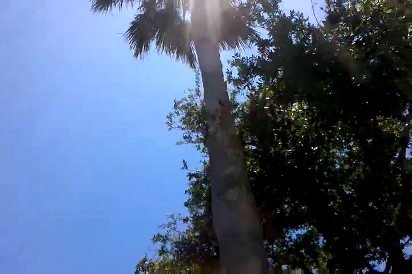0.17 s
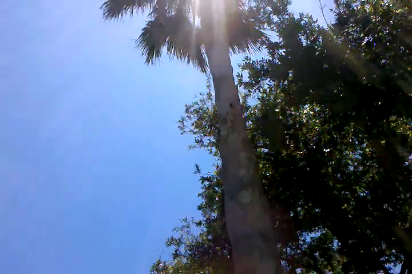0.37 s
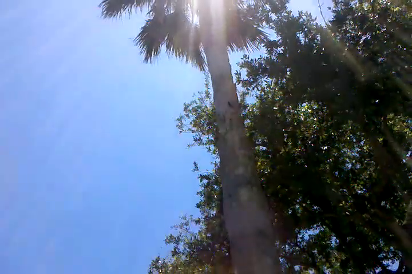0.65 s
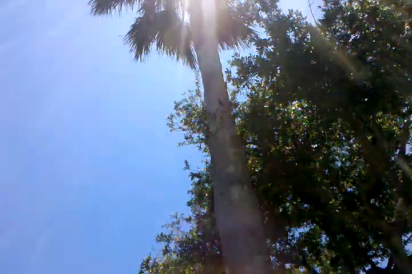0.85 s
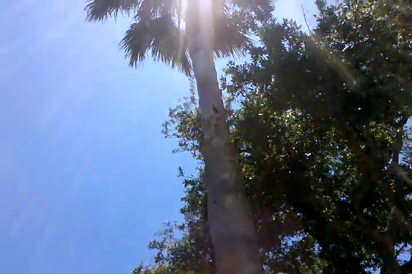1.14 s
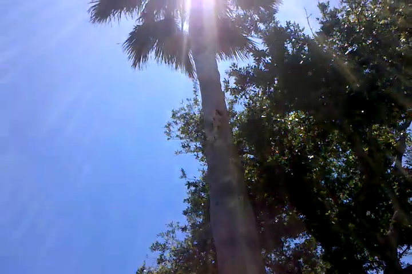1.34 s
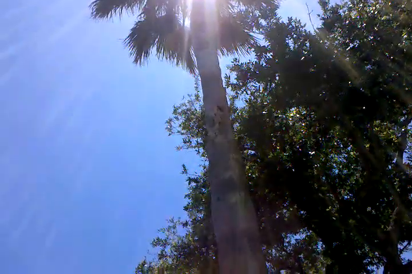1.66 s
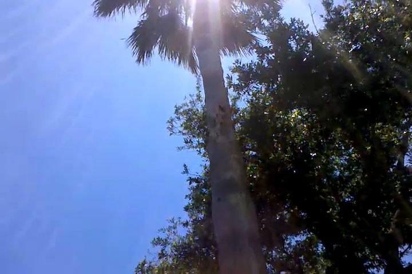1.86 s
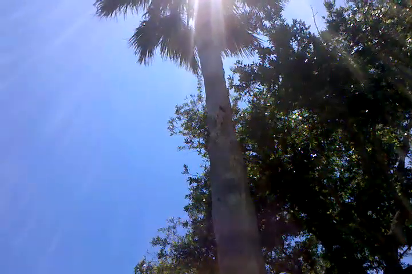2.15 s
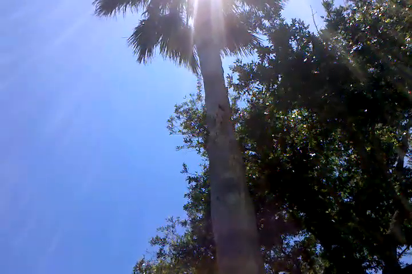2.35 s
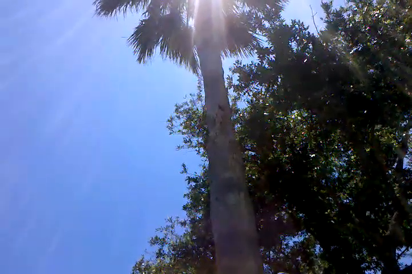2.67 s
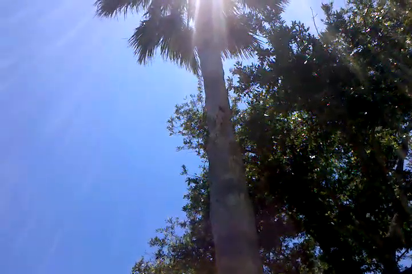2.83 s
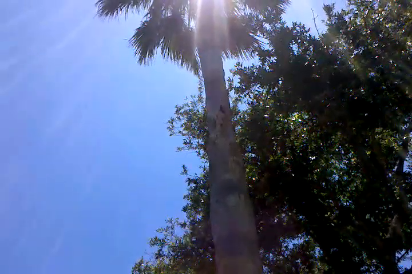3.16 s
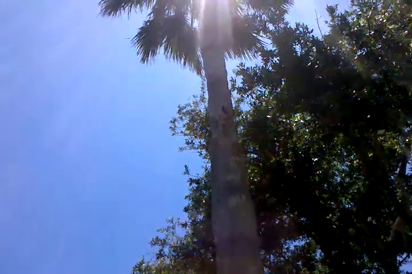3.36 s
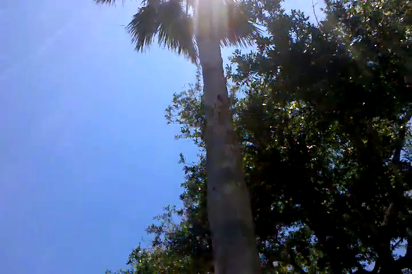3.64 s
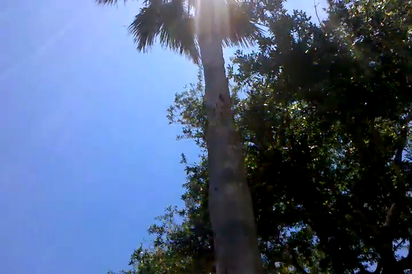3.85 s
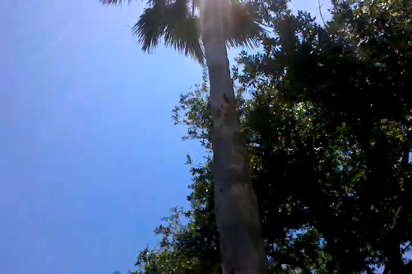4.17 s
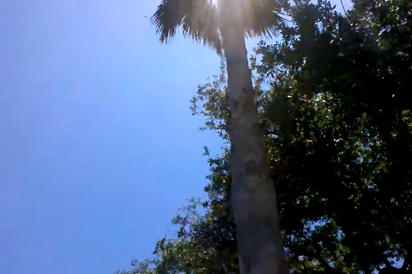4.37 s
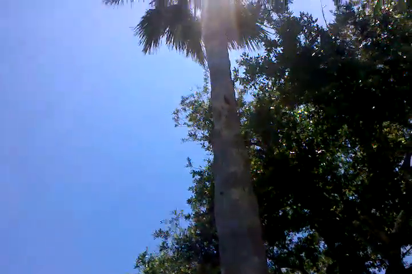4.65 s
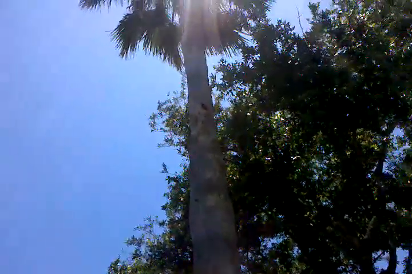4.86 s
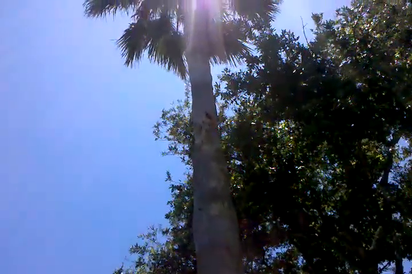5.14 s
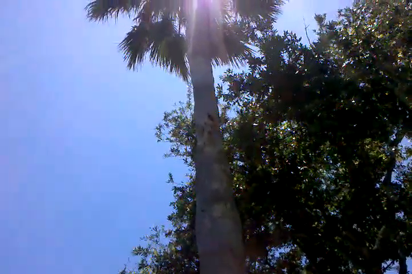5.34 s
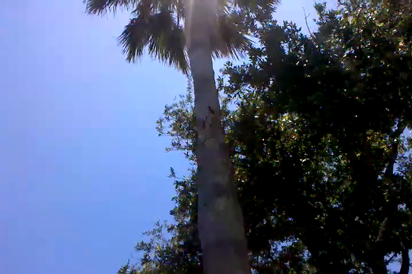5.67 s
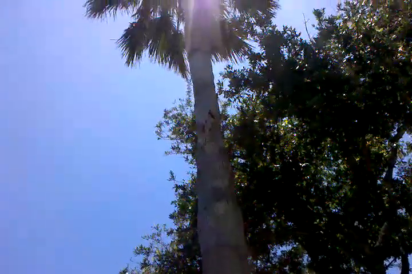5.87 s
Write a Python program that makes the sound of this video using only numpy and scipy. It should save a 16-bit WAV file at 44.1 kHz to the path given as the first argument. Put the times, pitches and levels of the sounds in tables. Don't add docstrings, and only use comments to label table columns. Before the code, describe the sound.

A quiet garden at the edge of town, heard through a slightly dull phone microphone: low rumble, distant traffic wash and a light breeze in leaves throughout. A faint peep and a low raspy chirp come at 0-0.3 s, then a distant nasal two-note call at 1.1-1.4 s with another faint chirp. Soft low handling bumps occur, and tiny dry finger clicks at 1.9-2.05 s. From 2.27 to 3.0 s a woodpecker drums one loud roll: twelve even blows, about fifteen a second, the first softer, each a hollow woody knock with a bark snap and short echoes. The nasal call and a chirp return at 3.15-3.6 s while a far motor hums low, swelling again around 4.4-5.0 s. From 4.3 s to the end at 6 s, echoing chirps, quick falling tsips, thin whistles and a last nasal call overlap with more frequent soft bumps.

```python
import sys
import numpy as np
from scipy import signal
from scipy.fft import rfft, irfft, next_fast_len
from scipy.io import wavfile
from scipy.ndimage import uniform_filter1d, map_coordinates

SR = 44100
rng = np.random.default_rng(int(sys.argv[2]) if len(sys.argv) > 2 else 0)


def linear_from_db(decibels):
    return 10 ** (np.asarray(decibels, float) / 20)


def persist_wave(psi):
    counts = np.round(np.clip(psi, -1, 1) * 32767).astype(np.int16)
    wavfile.write(sys.argv[1], SR, np.atleast_2d(counts).T)


N = 264952
TIME = np.arange(N) / SR


def unit(x):
    return x / np.sqrt(np.mean(x ** 2) + 1e-20)


def along(points, hz):
    f, v = np.transpose(points)
    return np.interp(np.log(hz + 1), np.log(f + 1), v)


def wobble(rate):
    knots = rng.standard_normal(int(N * rate / SR) + 4)
    return map_coordinates(knots, [TIME * rate])


def coloured(x, spectrum):
    m = next_fast_len(len(x) + 8192)
    gain = linear_from_db(along(spectrum, np.fft.rfftfreq(m, 1 / SR)))
    return irfft(rfft(x, m) * gain, m)[:len(x)]


def rush(spectrum, patchy_db):
    z = signal.stft(rng.standard_normal(N + 512), nperseg=512)[2]
    field = uniform_filter1d(rng.standard_normal(z.shape), 6, 0)
    field = uniform_filter1d(field, 14, 1)
    noise = signal.istft(z * linear_from_db(patchy_db * unit(field)), nperseg=512)[1][:N]
    return unit(coloured(noise, spectrum))


def note(rows, start=0., stretch=1.):
    s, *cols = np.transpose(rows)
    s = start + stretch * s
    span = slice(round(s[0] * SR), min(round(s[-1] * SR), N))
    t = TIME[span]
    edge_s = 0.025 * (s[-1] - s[0]) + 1e-4
    fade = np.clip(np.minimum(t - s[0], s[-1] - t) / edge_s, 0, 1)
    return span, fade, [np.interp(t, s, c) for c in cols]


def cycles(hz):
    return 2 * np.pi * np.cumsum(hz) / SR


# (frequency [Hz], t60 [s])
GARDEN_T60 = [(300, 0.2), (800, 0.44), (2000, 0.79), (7000, 0.29)]


def garden(x, echoes, loss, tail_db, linger):
    hz, t, z = signal.stft(rng.standard_normal(SR // 2), SR, nperseg=256)
    decay = linear_from_db(-60 * t / (linger * along(GARDEN_T60, hz)[:, None]))
    tail = signal.istft(z * decay, SR, nperseg=256)[1]
    tail *= linear_from_db(tail_db) / np.linalg.norm(tail)
    reply = np.pad(tail, (round(0.024 * SR), 0))
    for s, db in echoes:
        reply[round(s * SR)] += linear_from_db(db)
    return coloured(signal.fftconvolve(x, reply)[:N], loss)


# (frequency [Hz], density [dB per Hz])
RUMBLE_SPECTRUM = [(15, -59.5), (25, -55.5), (59, -12), (107, 0.5), (145, -1.5), (223, -3.5), (350, -17),
                   (460, -30.5), (770, -120)]
TRAFFIC_SPECTRUM = [(160, -7.5), (280, -6.5), (330, -4.5), (494, -8), (629, -7), (1800, -15.5), (2340, -30),
                    (3960, -120)]
LEAVES_SPECTRUM = [(1290, -23.5), (2200, -4.5), (2450, -4.5), (3330, -7), (3600, -8), (4040, -7.5),
                   (5100, -9.5), (6540, -6.5), (6960, -8.5), (7600, -15), (9880, -58.5), (16700, -120)]
# (time [s], level [dB])
BREEZE = [(0, 0), (1.3, -0.5), (2.2, 1), (2.6, 4.5), (3.3, 2.5), (3.8, 0.5), (5, -2.1), (5.5, 1.3),
          (6.01, -0.5)]
# (time [s], length [s], level [dB])
MOTOR_LOADS = [
    (3.363, 0.77, -64),
    (4.4, 0.66, -66.5),
]
# (order, level [dB])
MOTOR_ORDERS = [(1, -16), (2, 1), (3, -6)]


def town():
    breeze_db = np.interp(TIME, *np.transpose(BREEZE))
    rumble_db = -65 + 0.83 * wobble(5.7) + 0.37 * wobble(2.77)
    traffic_db = -64.5 + 0.4 * breeze_db + 0.17 * wobble(4.6)
    leaves_db = -71.5 + breeze_db + 0.41 * wobble(12)
    out = linear_from_db(rumble_db) * rush(RUMBLE_SPECTRUM, patchy_db=0.0)
    out += linear_from_db(traffic_db) * rush(TRAFFIC_SPECTRUM, patchy_db=0.5)
    out += linear_from_db(leaves_db) * rush(LEAVES_SPECTRUM, patchy_db=1.52)
    idle_db, ramp_s, motor_hz = -76, 0.15, 111
    motor_db = idle_db + 1.2 * wobble(5)
    for s, length, db in MOTOR_LOADS:
        load = np.clip(np.minimum(TIME - s, s + length - TIME) / ramp_s, 0, 1)
        motor_db += (db - idle_db) * load
    shaft = cycles(motor_hz * (1 + 0.0081 * wobble(15)))
    motor = sum(linear_from_db(order_db) * np.sin(k * shaft) for k, order_db in MOTOR_ORDERS)
    return out + linear_from_db(motor_db) * motor


# (time [s], length [s], from [Hz], to [Hz], level [dB])
WHISTLES = [
    (4.912, .108, 3650, 3625, -71),
    (5.04, .18, 3700, 3690, -77),
    (0.015, .07, 3140, 3100, -73),
    (5.965, .043, 3075, 3120, -74),
    (3.415, .033, 1640, 1390, -63),
]
# (time [s], level [dB], slowness [ratio])
SEEPS = [
    (5.212, -64.5, 0.95),
    (5.469, -67.5, 0.93),
    (5.734, -65, .75),
]
# (time [s], pitch [Hz], level [dB])
SEEP = [(0, 4850, -5), (.05, 4520, 0), (.09, 4330, -1), (.13, 4400, -3), (.18, 4300, -3), (.25, 4270, -6)]
# (time [s], level [dB], slowness [ratio])
TSIPS = [
    (4.33, -63, 1.05),
    (4.654, -57, 1.1),
    (4.837, -53, 0.85),
    (4.995, -62.5, 1.05),
    (5.667, -67.5, 3.1),
    (5.849, -65, 3.4),
]
# (time [s], pitch [Hz], level [dB])
TSIP = [(0, 7200, -12), (.002, 6900, 0), (.007, 5900, -3), (.011, 4900, -13), (.03, 3900, -21)]


def whistlers():
    out, tremble, flutter = np.zeros(N), wobble(130), wobble(90)
    notes = []
    for s, length, from_hz, to_hz, db in WHISTLES:
        glide = [(0, from_hz, 0), (1, to_hz, -2)]
        notes.append((glide, s, db, length))
    notes += [(SEEP, *row) for row in SEEPS]
    notes += [(TSIP, *row) for row in TSIPS]
    for rows, s, level_db, slowness in notes:
        span, fade, (hz, db) = note(rows, s, slowness)
        loose = min(len(hz) / SR / 0.11, 1) ** 2
        phase = cycles(hz * (1 + 0.014 * loose * tremble[span]))
        out[span] += fade * linear_from_db(level_db + db + 3.2 * loose * flutter[span]) * np.sin(phase)
    return out


# (delay [s], level [dB])
BIRD_WALLS = [(.03, -17), (.055, -8), (.085, -15), (.12, -17)]
# (frequency [Hz], level [dB])
GROUND_LOSS = [(300, 0), (1600, 0), (3000, -3), (7000, -9)]


def bird_replies(thin, nasal, harsh):
    out = garden(thin, BIRD_WALLS[:1], GROUND_LOSS, tail_db=-2.5, linger=0.7)
    out += garden(nasal, BIRD_WALLS[:2], GROUND_LOSS, tail_db=-10, linger=0.7)
    out += garden(harsh, BIRD_WALLS, GROUND_LOSS, tail_db=-1.5, linger=1.6)
    return out


# (time [s], pitch factor [ratio], beak factor [ratio], slowness [ratio], level [dB])
CHIRPS = [
    (.137, .725, .89, 1.2, -62),
    (1.258, .76, .99, 1.02, -64.5),
    (3.156, .99, 1.0, 1.17, -60.5),
    (4.448, 1.0, 1.01, 1.02, -59.5),
    (5.79, .97, .99, 1.1, -61),
]
# (time [s], pitch [Hz], level [dB], beak resonance [Hz], rasp [0-1])
CHIRP = [(0, 560, -17, 5400, .9), (.018, 610, -6, 4700, .85), (.032, 670, -3, 3950, .3),
         (.046, 780, 0, 3600, .24), (.058, 800, 0, 3500, .22), (.073, 730, -1, 3000, .16),
         (.094, 625, -3, 2650, .14)]


def chirper():
    out, flutter = np.zeros(N), wobble(90)
    for s, factor, beak, slowness, db in CHIRPS:
        span, fade, (hz, shape_db, beak_hz, rasp) = note(CHIRP, s, slowness)
        hz, beak_hz = hz * factor, beak_hz * beak
        jitter = uniform_filter1d(rng.standard_normal(len(hz)), size=40)
        jitter = unit(uniform_filter1d(jitter, size=40))
        phase = cycles(hz) + 0.4 * rasp * jitter
        width_hz = 500 + 800 * rasp
        stack = np.zeros(len(hz))
        for k in range(2, 14):
            stack += np.exp(-((k * hz - beak_hz) / width_hz) ** 2) * np.sin(k * phase)
        out[span] += fade * linear_from_db(db + shape_db + 3.2 * flutter[span]) * stack
    return out


# (time [s], peak level [dB])
CLICKS = [
    (1.928, -55),
    (1.9849, -53),
    (2.0323, -55),
    (2.05, -54),
]
# (time [s], peak level [dB], pitch [Hz])
BUMPS = [(0.166, -59, 174), (0.757, -48, 112), (0.949, -54, 112), (1.34, -51, 119), (1.796, -50, 140),
         (3.284, -57, 125), (3.959, -47.5, 115), (4.091, -45.5, 111), (4.276, -53, 133),
         (4.487, -43.5, 139), (4.519, -46, 131), (4.975, -47, 154), (5.019, -48, 124), (5.112, -51.5, 145),
         (5.268, -51, 102), (5.499, -46.5, 187), (5.672, -43, 143), (5.708, -48, 122), (5.838, -48, 193),
         (5.9, -47.5, 117.5)]


def hand():
    clicks, bumps, t = np.zeros(N + SR), np.zeros(N + SR), np.arange(SR // 10) / SR
    for s, db in CLICKS:
        clicks[round(s * SR):][:len(t)] += linear_from_db(db + 1.5 - 60 * t / 0.036) * rng.standard_normal(len(t))
    for s, db, hz in BUMPS:
        thud = np.sin(2 * np.pi * hz * t) * (1 - np.exp(-t / 0.0033))
        bumps[round(s * SR):][:len(t)] += linear_from_db(db + 2.0 - 60 * t / 0.081) * thud
    return coloured(clicks[:N], [(1500, -19), (3000, 2.5), (7000, -5)]) + bumps[:N]


# (time of top [s], scoop [s], hold [s], top pitch [Hz])
SHORT_NOTES = [
    (1.116, .012, .026, 980),
    (3.15, .025, .004, 1005),
    (5.245, .032, .003, 965),
]
# (time [s], length [s], glide [s], from [Hz], top pitch [Hz])
LONG_NOTES = [
    (1.165, .235, .14, 815, 874),
    (3.275, .295, .08, 845, 866),
    (5.34, .21, .062, 680, 845),
]
# (first note level [dB], second note level [dB], beak opening on first [dB], on second [dB])
CALL_LEVELS = [
    (-68.5, -70, 2.5, 1),
    (-67.5, -72, -3, -2),
    (-70, -64, 5, -1.5),
]


def calls():
    scoop_from, scoop_db = 0.74, -11
    sink_to, sink_hz_per_s, sink_db = 0.84, 4300, -4
    droop_to, droop_s, droop_db, sag_db = 0.87, 0.04, -4, -2.5
    opens_db, closes_db = 5, 4
    for short, long, levels in zip(SHORT_NOTES, LONG_NOTES, CALL_LEVELS):
        top, scoop, hold, hz = short
        s, length, glide, low, high = long
        db, held_db, beak_db, wide_db = levels
        end = top + hold + hz * (1 - sink_to) / sink_hz_per_s
        yield [(top - scoop, scoop_from * hz, db + scoop_db, beak_db),
               (top, hz, db, beak_db),
               (top + hold, hz, db, beak_db),
               (end, sink_to * hz, db + sink_db, beak_db)]
        entry_db = held_db + scoop_db * (1 - low / high) / (1 - scoop_from)
        leap_s, leap_hz = s + 0.65 * glide, low + 0.3 * (high - low)
        yield [(s, low, entry_db, wide_db - opens_db),
               (leap_s, leap_hz, entry_db, wide_db - opens_db),
               (s + glide, high, held_db, wide_db),
               (s + length - droop_s, high, held_db + sag_db, wide_db - closes_db),
               (s + length, droop_to * high, held_db + sag_db + droop_db, wide_db - 2 * closes_db)]


# (frequency [Hz], level [dB])
CALLER_THROAT = [(1750, 2), (2600, -3), (3400, -10), (3900, -10), (4300, -2.5), (5100, -7), (5700, -19),
                 (7000, -16)]


def caller():
    out = np.zeros(N)
    unsteady = [wobble(45) for k in range(8)]
    for rows in calls():
        span, fade, (hz, db, open_db) = note(rows)
        phase = cycles(hz)
        stack = np.zeros(len(hz))
        for k in range(2, 8):
            overtone_db = along(CALLER_THROAT, k * hz) + open_db * (k > 2)
            overtone_db += (1.3 + 0.2 * k) * unsteady[k][span]
            stack += linear_from_db(overtone_db) * np.sin(k * phase)
        out[span] += fade * linear_from_db(db + 2.5) * stack
    return out


# (time [s], peak level [dB])
BLOWS = [(2.267, -26), (2.328, -21), (2.391, -21), (2.455, -19), (2.52, -18), (2.586, -18.5), (2.652, -18),
         (2.718, -17.5), (2.786, -18), (2.853, -18), (2.921, -18), (2.991, -19.5)]
# (frequency [Hz], level [dB], t60 [s], direction of motion at the beak [+1/-1])
TRUNK = [(487, -11.7, .1, -1), (647, -13.6, .026, -1), (784, -13.4, .12, 1), (818, -2.4, .061, 1),
         (959, -7, .019, -1), (994, -10.6, .02, 1), (1393, -12.7, .049, -1), (1500, -22.6, .062, -1),
         (1783, -18, .009, -1), (2070, -13.6, .008, 1)]
# (frequency [Hz], level [dB], t60 [s])
BARK_SHELL = [(1131, -24.5, 0.11), (1850, -40.5, 0.15), (2280, -45, 0.099), (2565, -35, 0.095),
              (2733, -32, 0.067), (3360, -33.5, 0.032)]
# (frequency [Hz], level [dB])
CRACK = [(1500, -22), (2300, 4.5), (3000, -1), (3900, 2), (4500, -0.5), (5000, 2.5), (5700, -7.5),
         (6600, 4), (8500, -32)]


def woodpecker():
    t = np.arange(SR // 6) / SR
    hz, level_db, t60, way = np.transpose(TRUNK)[:, :, None]
    modes = way * linear_from_db(level_db - 60 * t / t60) * np.sin(2 * np.pi * hz * t)
    modes *= 1 - np.exp(-t / 0.00015)
    modes = signal.lfilter(*signal.butter(2, 400, "high", fs=SR), modes)
    low, middle, upper = modes[:-4].sum(0), modes[-4:-2].sum(0), modes[-2:].sum(0)
    late = np.clip(t - 0.0007, 0, 1)
    shell = sum(linear_from_db(db - 60 * late / t60) * np.sin(2 * np.pi * hz * late) for hz, db, t60 in BARK_SHELL)
    snap_shape = linear_from_db(-60 * late / 0.012) * (1 - np.exp(-late / 0.0009))
    same = rng.standard_normal(len(t))
    full_blow_db, hardens = -19.5, 1.2
    wood, bark = np.zeros(N), np.zeros(N)
    for s, db in BLOWS:
        hard = linear_from_db(hardens * (db - full_blow_db))
        ring = low + hard ** 0.4 * middle + hard * (upper + shell)
        snap = unit(coloured(same + 0.35 * rng.standard_normal(len(t)), CRACK)) * snap_shape
        wood[round(s * SR):][:len(t)] += linear_from_db(db - 1.0) * ring
        bark[round(s * SR):][:len(t)] += linear_from_db(db - 15.5) * hard * snap
    return wood, bark


# (delay [s], level [dB])
NEAR = [
    (.0095, -10.6),
    (.0163, -12),
]
# (delay [s], level [dB])
WALLS = [(.034, -29), (.043, -27), (.088, -31), (.109, -24.5), (.124, -29), (.139, -30), (.186, -31)]
# (frequency [Hz], level [dB])
WALL_LOSS = [(350, -14), (500, -9), (800, 0), (1400, -9), (3000, -12), (7000, -22)]


def drum_replies(wood, bark):
    out = garden(wood, NEAR, GROUND_LOSS, tail_db=-26, linger=0.47)
    out += garden(bark, NEAR[:1], GROUND_LOSS, tail_db=-26.5, linger=0.5)
    out += garden(wood, WALLS, WALL_LOSS, tail_db=-26, linger=1.3)
    return out


def scene():
    background = town()
    thin, harsh, nasal = whistlers(), chirper(), caller()
    birds = thin + harsh + nasal + bird_replies(thin, nasal, harsh)
    wood, bark = woodpecker()
    drumming = wood + bark + drum_replies(wood, bark)
    return (background + birds + hand() + drumming)[None]


def low_pass(x):
    return signal.sosfilt(signal.butter(12, 7750, fs=SR, output="sos"), x)


def record(dry):
    response = [(30, -18), (80, -2), (6900, 1.0), (7600, -11.5), (8600, -9), (9300, -70)]  # (Hz, dB)
    phone = coloured(dry[0], response)
    hiss = linear_from_db(-100) * rng.standard_normal(N)
    return low_pass((phone + hiss)[None])


dry = scene()
out = record(dry)
persist_wave(out)
```